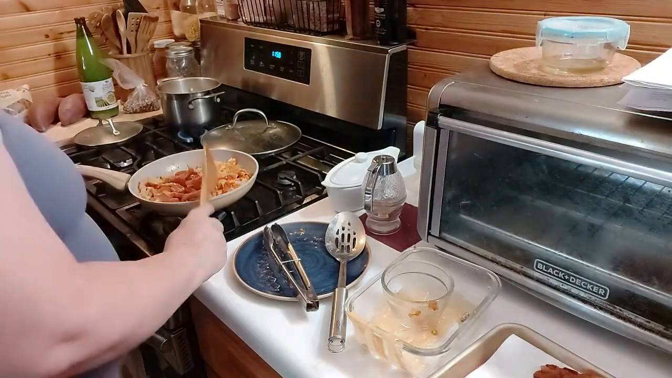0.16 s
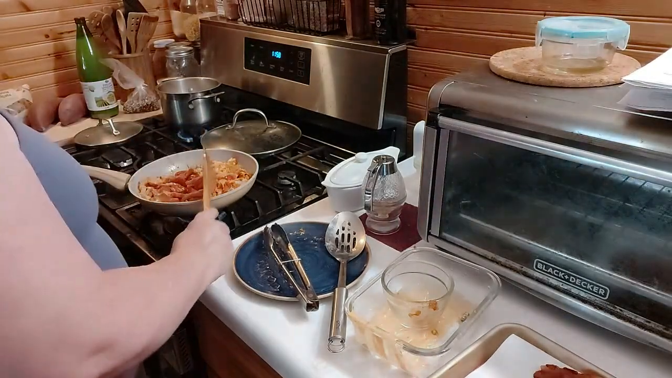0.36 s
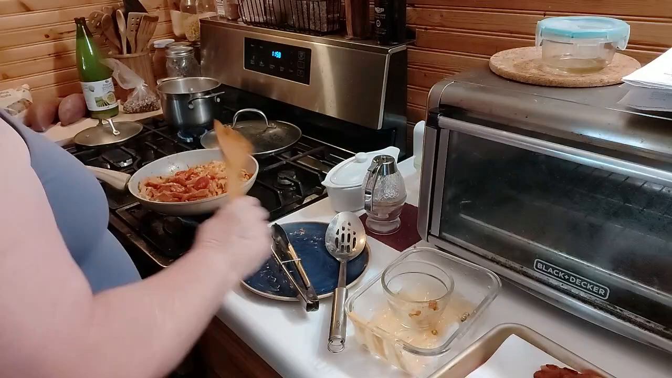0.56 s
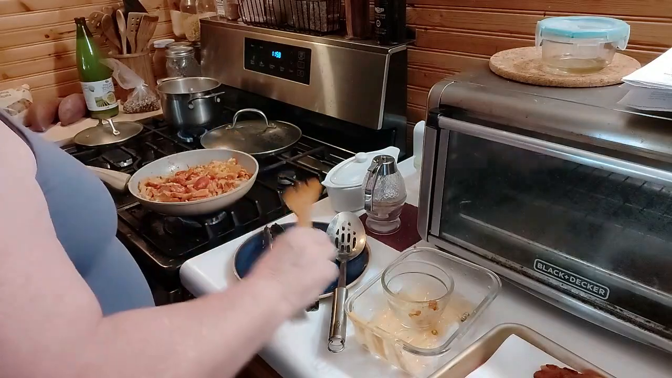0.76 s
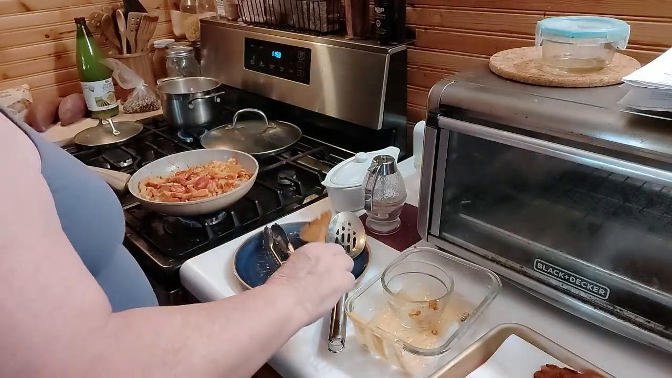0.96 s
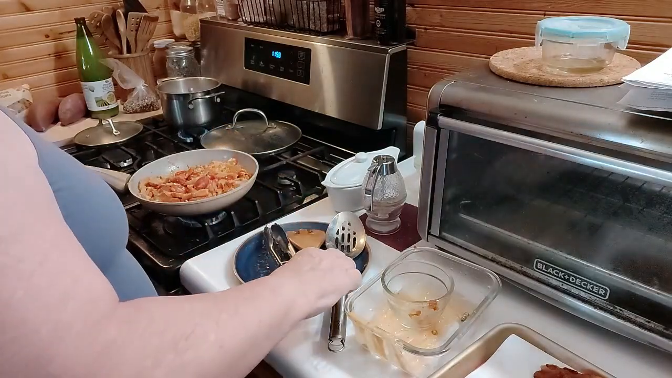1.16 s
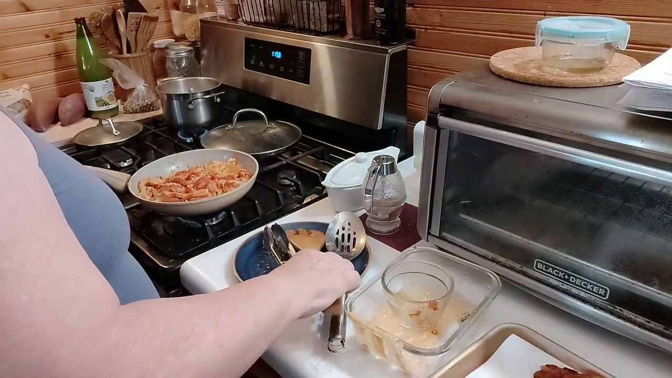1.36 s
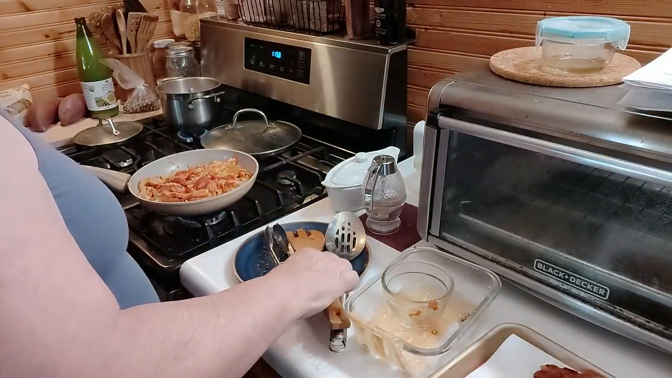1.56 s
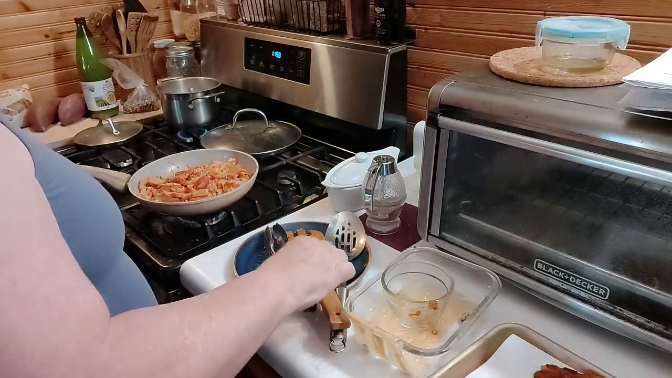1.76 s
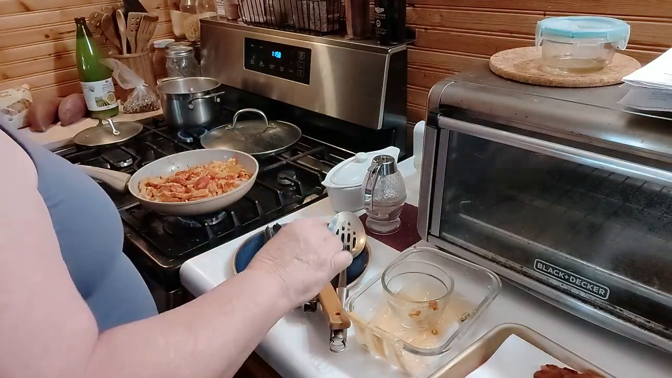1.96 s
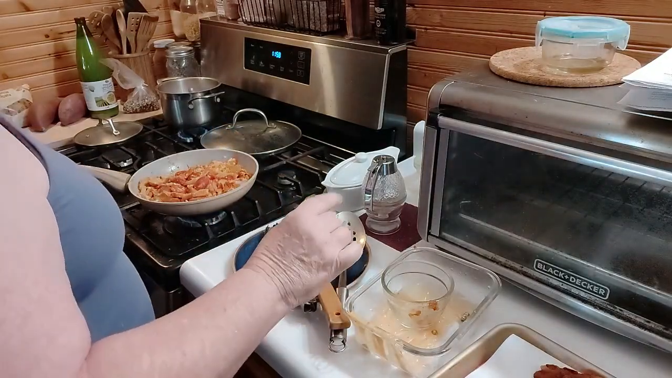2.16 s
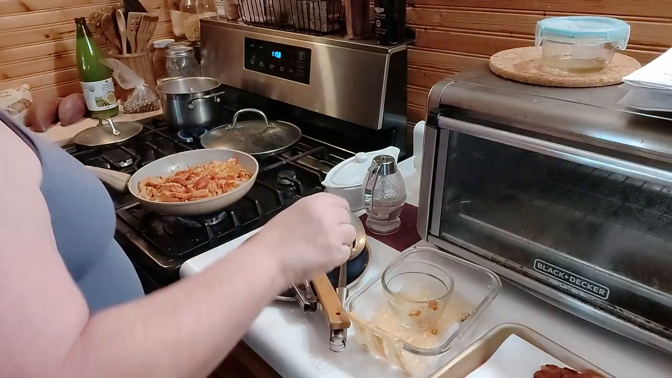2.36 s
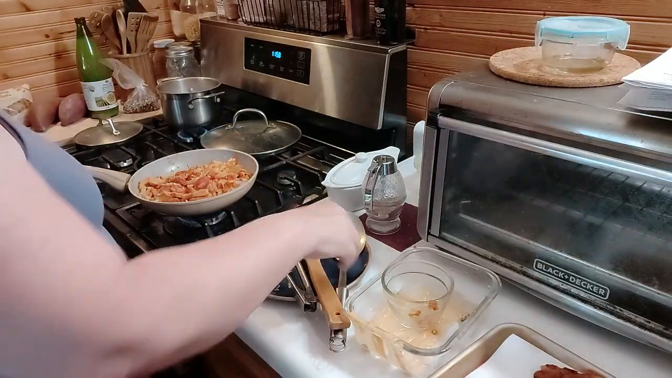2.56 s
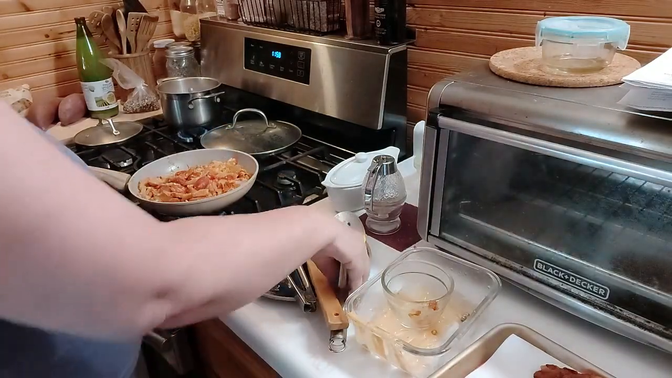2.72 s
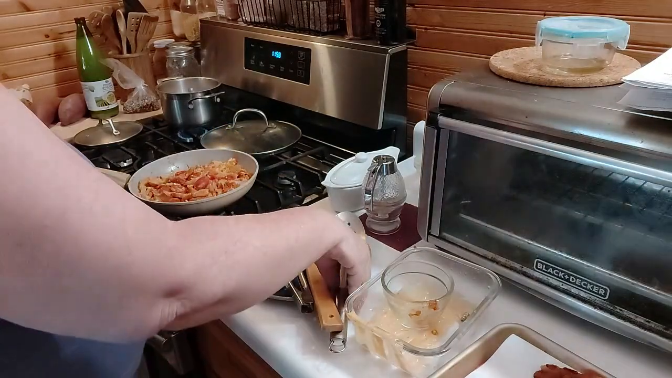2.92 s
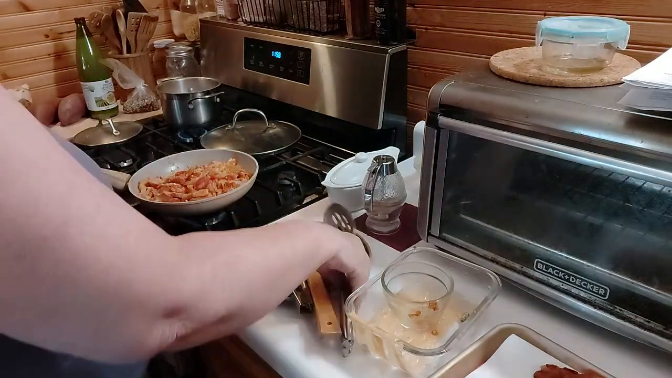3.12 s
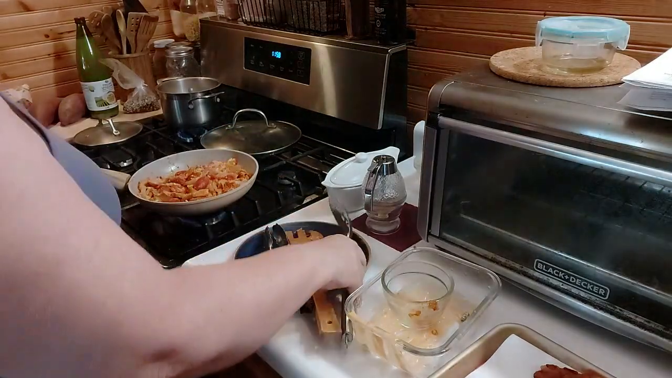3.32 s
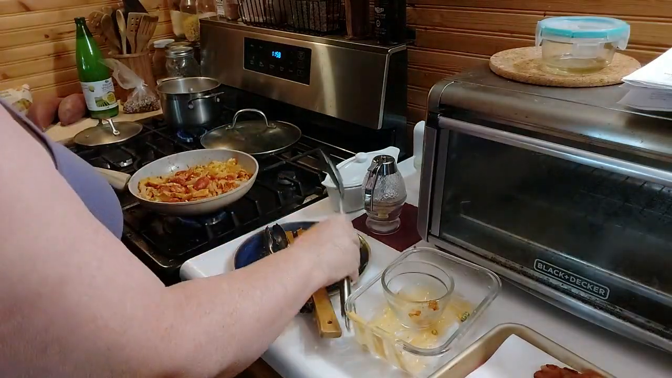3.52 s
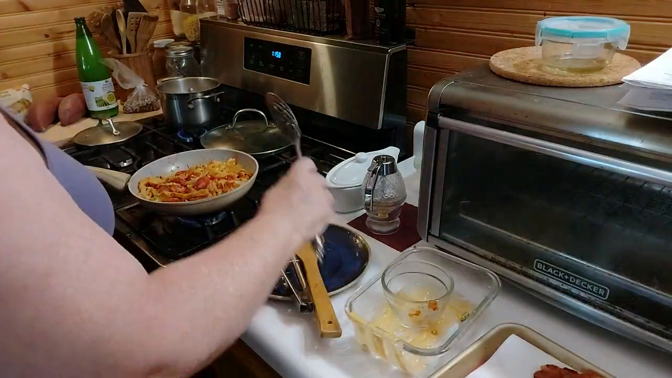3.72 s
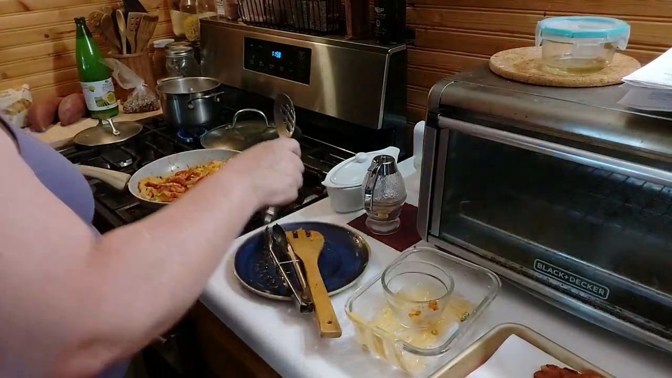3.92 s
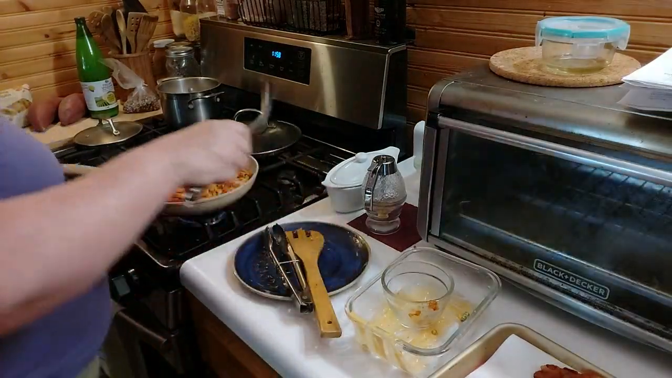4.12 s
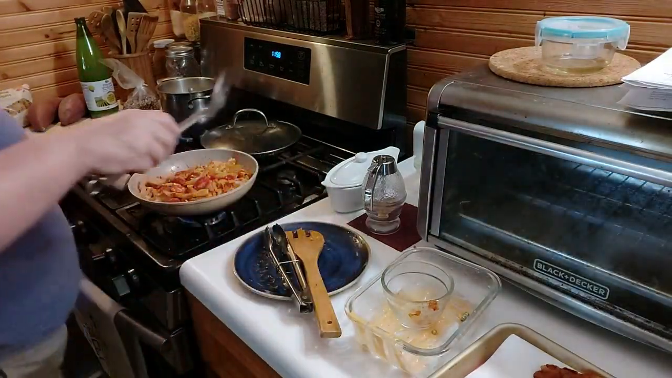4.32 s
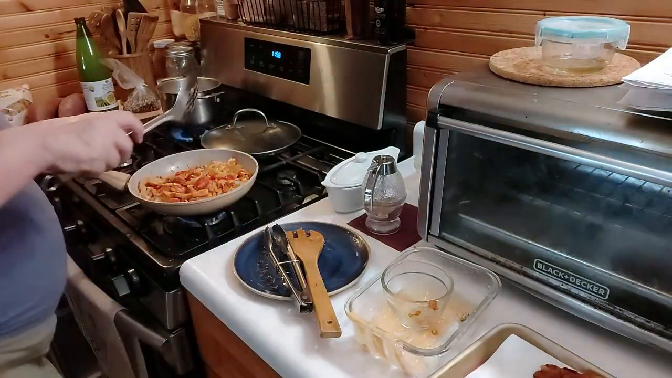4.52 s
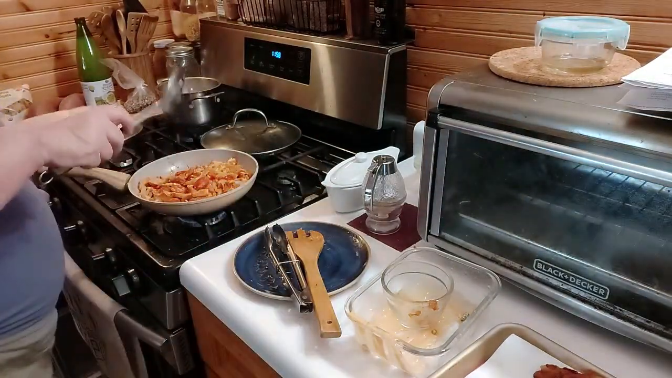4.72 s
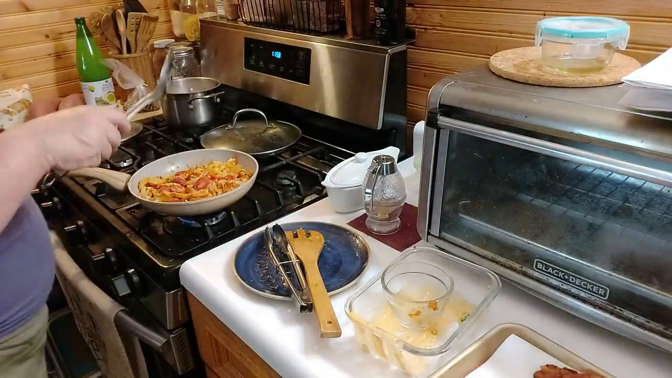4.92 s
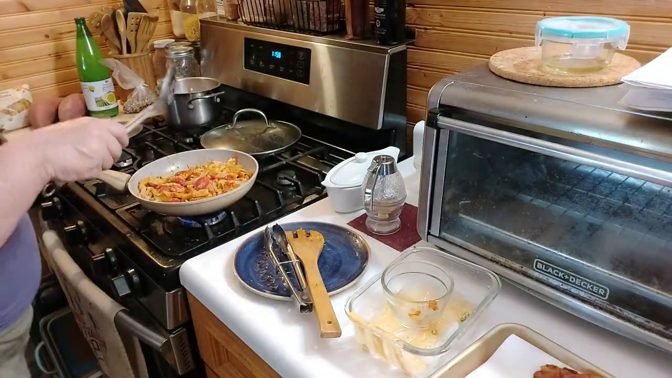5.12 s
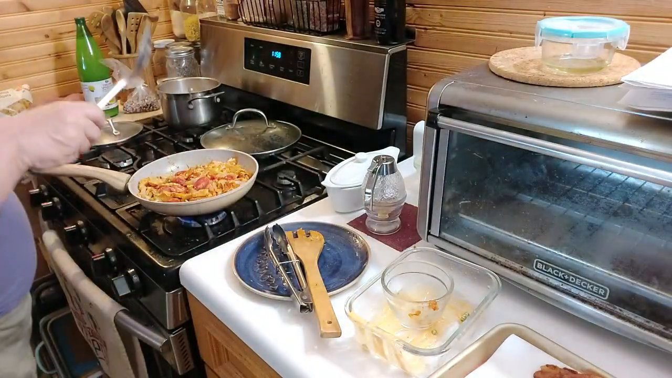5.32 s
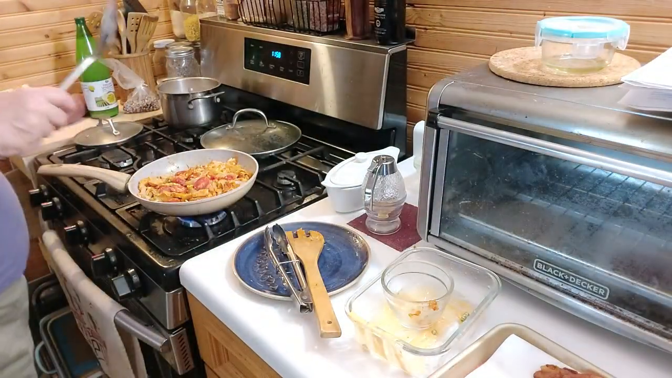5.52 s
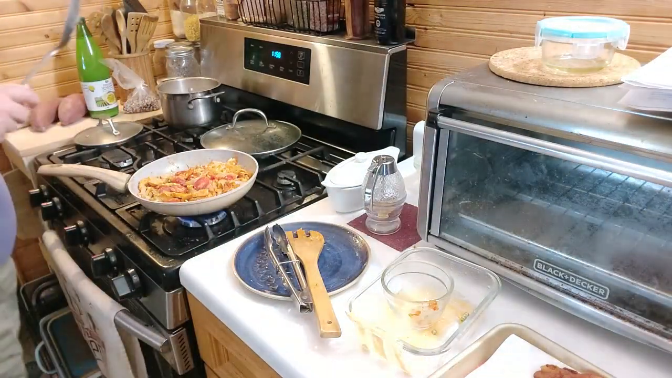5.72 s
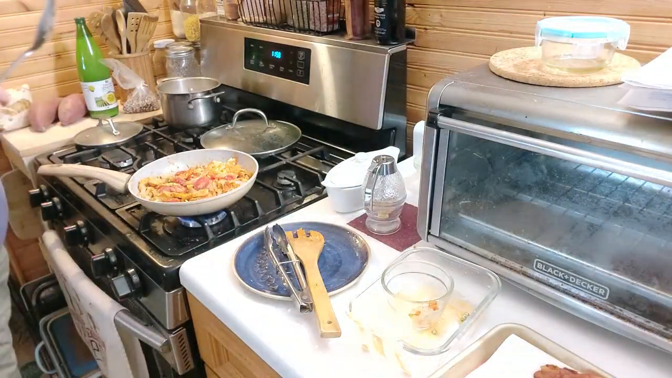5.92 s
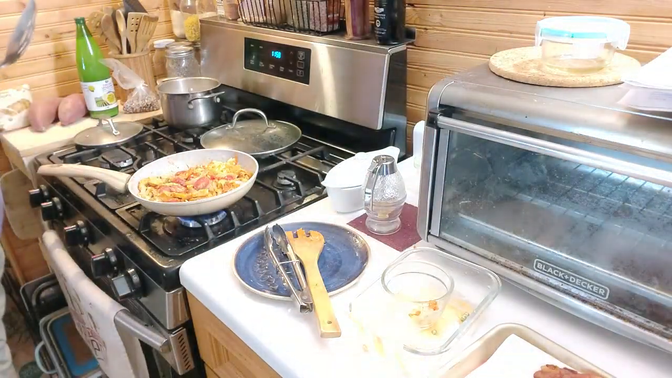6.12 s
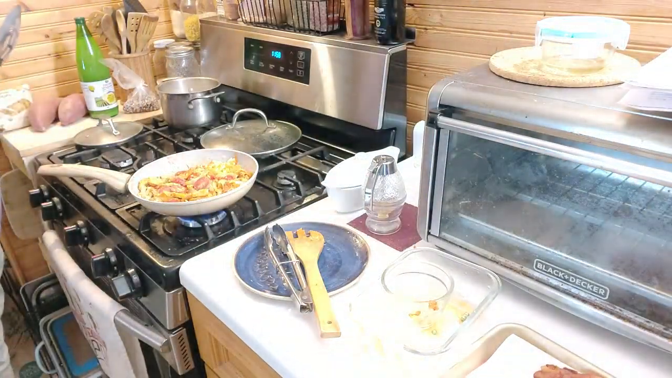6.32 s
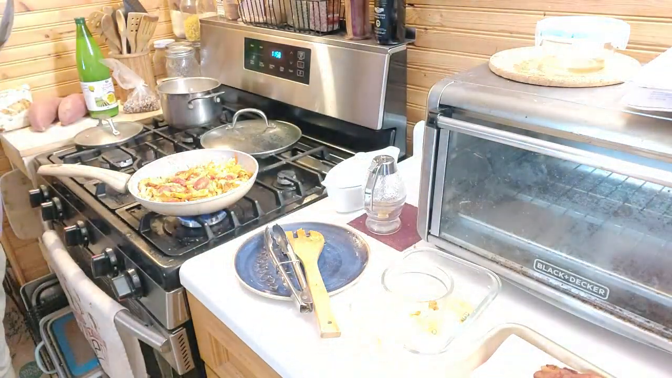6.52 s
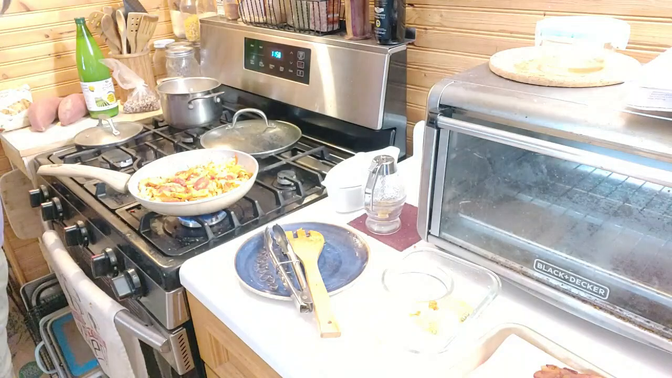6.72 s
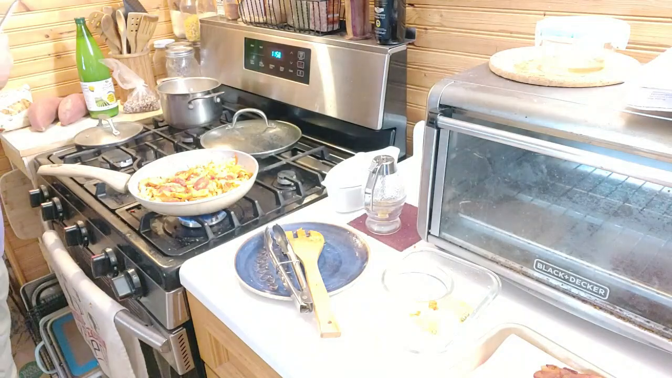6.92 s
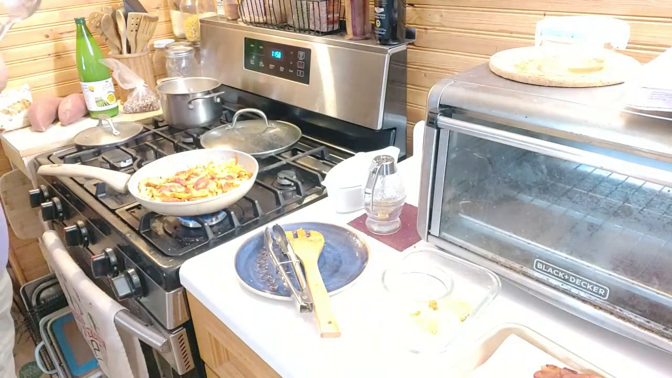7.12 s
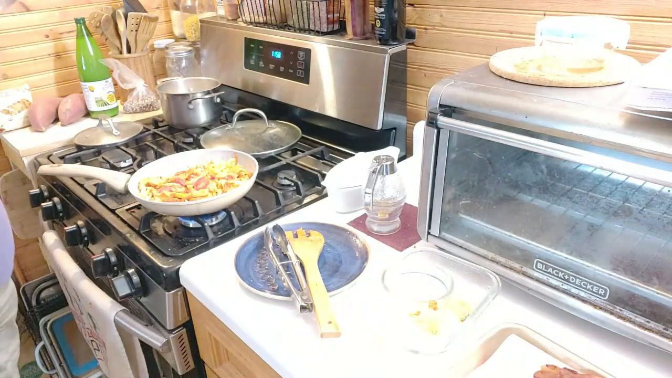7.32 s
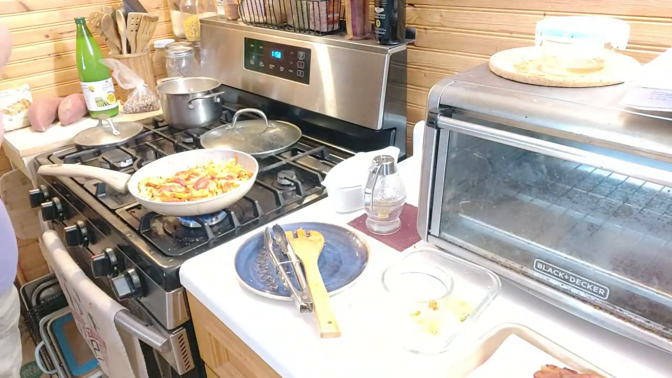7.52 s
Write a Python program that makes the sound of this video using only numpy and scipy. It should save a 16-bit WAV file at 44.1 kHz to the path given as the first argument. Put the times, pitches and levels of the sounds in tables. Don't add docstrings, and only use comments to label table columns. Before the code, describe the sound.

In a small kitchen, a spatula raps a pan twice, steel utensils clatter briefly on a plate, then quiet frying spits softly.

```python
import sys
import numpy as np
from scipy import signal
from scipy.io import wavfile

SR = 44100
rng = np.random.default_rng(int(sys.argv[2]) if len(sys.argv) > 2 else 0)


def pcm_store(signal):
    levels = np.round(np.clip(np.atleast_2d(signal), -1, 1) * 32767)
    wavfile.write(sys.argv[1], SR, levels.astype(np.int16).T)


N = 333837

# band_hz, level_db (per Hz)
AIR_COLOUR = [(30, -43), (45, -14), (70, -6.5), (110, -16), (160, -16.5), (330, -18), (550, -16.5),
              (1100, -20.5), (2500, -27.5), (5000, -34), (7000, -35.5), (11500, -33), (14000, -28),
              (17000, -45)]
# band_hz, correlation
AIR_LIKENESS = [(60, 0.78), (180, 0.91), (400, 0.66), (800, 0.036), (1650, -0.26), (4970, -0.0075),
                (15000, -0.13)]
# time_s, level_db
AIR_LEVEL = [(0, -58.5), (.9, -60), (2.2, -60.5), (3.0, -59.5), (4.1, -59.5), (5.8, -58), (7.57, -58)]
# pitch_hz, width_hz, level_db (rms)
MOTOR_LINES = [(57.3, 9.6, -50), (119.7, 1.8, -64), (187, 11, -71.5), (241, 6.3, -69), (267, 8.7, -80.5),
               (293, 3, -64.5), (336.3, 12.6, -66), (534.6, 1.8, -65), (4100, 140, -73)]
# start_s, level_db (rms), pitch_hz, width_octaves, length_s
STEAM_HISSES = [(2.416, -62, 7000, 1.5, .062), (2.57, -59.5, 11500, .6, .09), (2.762, -61, 11900, .4, .07),
                (2.946, -59, 11000, 0.44, .1), (4.02, -59.5, 10000, .6, .094),
                (4.477, -52.5, 7900, 5.2, 0.073), (5.17, -57, 9300, 0.73, .11),
                (5.26, -62.5, 9000, 0.42, .098), (5.688, -62.5, 8550, 0.18, 0.23),
                (6.24, -55.5, 12000, .8, .14), (6.258, -59.5, 4400, 1.3, 0.14),
                (6.70, -60, 15000, .2, 0.095), (6.793, -61, 13000, .6, 0.077),
                (6.94, -61.5, 8400, 0.92, .11)]
# start_s, peak_db, pitch_hz
FAT_SPITS = [(2.2323, -48.5, 11950), (2.4426, -55, 9630), (2.5773, -51.5, 14500), (2.7808, -45, 12300),
             (3.7192, -44, 15100), (3.794, -46, 11300), (4.002, -50.5, 11600), (4.2972, -48, 10930),
             (4.4224, -43, 9900), (4.5094, -58, 11100), (4.61, -47.5, 9600), (4.6975, -41, 11600),
             (5.3126, -48, 11400), (5.7632, -44, 8450), (5.7962, -44, 8830), (5.9273, -47.5, 9150),
             (6.13, -49, 9000), (6.729, -49, 14940), (6.8007, -41.5, 15200), (7.0435, -48, 7500),
             (7.168, -50, 3600), (7.333, -52, 9000), (6.66, -51, 6500), (7.4604, -40.5, 5500),
             (7.507, -43, 10700)]

# band_hz, t60_s
KITCHEN_T60 = [(70, 0.59), (150, 0.38), (300, 0.42), (700, .38), (1800, 0.31), (5000, 0.28), (13000, .25)]
# band_hz, correlation
ECHO_LIKENESS = [(60, 0.93), (180, 0.99), (400, 0.85), (800, 0.54), (1650, 0.14), (4970, 0.036),
                 (15000, 0.058)]
EDGES_HZ = 40 * 2 ** np.arange(0, 9.0, .4)

# pitch_hz, level_db, t60_s
SKILLET_MODES = [(145, -3.5, 0.12), (297, -2.5, 0.11), (374.7, 5.5, 0.095), (500, -7, 0.053),
                 (630, -24, 0.085), (800, 2.5, 0.041), (1225, -4.5, 0.14), (1700, -9, 0.049),
                 (2970, -34, .03), (3500, -4, 0.075)]
PLATE_MODES = [(311.6, 3.5, 0.11), (418, -28, 0.027), (450, -1, 0.02), (1420, -4, 0.07), (1850, 5.5, 0.086),
               (2660, 6, 0.035), (3300, 6, 0.037), (4200, -76, 0.046), (4480, -5, 0.056), (5500, -35, .05)]
POT_MODES = [(547, 2.5, 0.03), (1160, -6, 0.1), (1500, 5, 0.044), (2240, -14, .05), (4140, -10, 0.091),
             (4270, -8, .14), (5700, -23, .03)]
# band_hz, level_db (per Hz)
SKILLET_CRACK = [(45, -6), (70, -14), (150, -1), (230, -13), (380, -2), (800, 2), (1500, 2), (3000, -5.5),
                 (8000, -13.5), (12000, -19.5), (16000, -33)]
PLATE_CRACK = [(45, -4), (70, 2), (130, 8.5), (210, -55), (330, 6), (700, -3.5), (1400, -1), (3200, 4),
               (7000, -9.5), (12000, -11), (16000, -74)]
SPOON_CRACK = [(130, 5), (210, -27), (330, 4), (700, -1.5), (1900, 1.5), (4000, -1), (11000, -14),
               (16000, -34)]
POT_CRACK = [(70, -7), (130, -11.5), (240, -15), (420, -8.5), (1300, -1), (2500, -5), (3300, -33),
             (4400, -3), (6500, -19.5), (11500, -16.5), (16000, -41.5)]

# start_s, peak_db
RIM_BLOWS = [
    (0.1716, -14),
    (0.3791, -16.5),
]
# delay_s, level_db, extra_treble_db, knock_pitch_hz, knock_db
RIM_CONTACTS = [
    (-.0037, -3, -1.5, 1300, -10),
    (0, -1, -2.5, 1445, -31),
    (.014, -5.5, 1.5, 600, 0.5),
]
RIM_BASS = (2.5, 0.5, 5)
# start_s, peak_db, knock_pitch_hz, knock_db
LAID_DOWN = [(1.094, -37.5, 1750, 14.5), (1.099, -46, 5500, 21), (1.104, -34, 4240, -6),
             (1.218, -45.5, 2980, -7), (1.252, -39, 4300, -9), (1.5175, -22, 2700, -20),
             (1.525, -20, 1950, 5), (1.541, -22, 1420, 9), (1.5955, -22.5, 3290, -0.5),
             (1.600, -30, 1420, 19), (1.619, -31, 4200, 8), (1.643, -39, 1420, 3)]
# start_s, peak_db, knock_pitch_hz, knock_db
PICKED_UP = [(2.925, -39, 2110, 1.4), (3.211, -27.5, 1500, 4.5), (3.222, -19, 3450, 1.1),
             (3.227, -27.5, 1850, 4.5), (3.239, -24.5, 4100, 2.7), (3.255, -25.5, 1280, 2.7),
             (3.311, -31.5, 3810, 9), (3.348, -38, 1940, 2.6), (3.37, -41, 1080, 19.3),
             (3.497, -38, 2180, 9.3), (3.501, -50, 4100, 4.4), (3.53, -50, 2210, 6)]
# start_s, peak_db, knock_pitch_hz, knock_db
THUDS = [(1.098, -37, 445, 19.5), (1.27, -51.5, 320, 27.5), (1.474, -60.5, 450, 35), (1.520, -36, 450, 24),
         (1.601, -35, 450, 19), (2.198, -60, 1080, 24), (2.935, -46, 468, 17.5), (3.222, -31, 449, 21),
         (3.267, -32, 325, 15.5), (3.33, -43, 313, 23.5), (3.371, -41.5, 820, 23.5), (3.505, -43, 880, 13)]
# start_s, length_s, level_db (rms)
RIM_SLIDES = [(.95, .15, -70), (2.27, .25, -68), (3.40, .11, -66), (4.62, .13, -73), (5.75, .1, -73)]
# start_s, peak_db, knock_pitch_hz
POT_TAPS = [
    (4.7581, -33.5, 4300),
    (4.763, -37.5, 1180),
]


def from_db(db):
    return 10 ** (np.asarray(db) / 20)


def unit_rms(x):
    return x / np.sqrt(np.mean(x ** 2) + 1e-20)


def at_hz(points, hz):
    table_hz, value = np.array(points).T
    return np.interp(np.log(hz), np.log(table_hz), value)


def drift(rate_hz):
    step = 40
    pole = np.exp(-2 * np.pi * rate_hz * step / SR)
    slow = signal.lfilter([1], [1, -2 * pole, pole * pole], rng.standard_normal(N // step + 2002))
    slow = unit_rms(slow[2000:])
    return np.interp(np.arange(N) / step, np.arange(len(slow)), slow)


def ring(x, hz, t60_s):
    pole = from_db(-60 / (t60_s * SR))
    turn = 2 * np.pi * hz / SR
    return signal.lfilter([0, np.sin(turn)], [1, -2 * pole * np.cos(turn), pole * pole], x)


def cut(x, kind, hz, order=2):
    return signal.sosfilt(signal.butter(order, hz, kind, fs=SR, output="sos"), x)


def stereo_bands(size, likeness):
    white = rng.standard_normal((2, 2, size))
    for k, (low, high) in enumerate(zip(EDGES_HZ, EDGES_HZ[1:])):
        mid, side = cut(white[k % 2], "band", [low, high])
        hz = np.sqrt(low * high)
        alike = np.clip(at_hz(likeness, hz), -1, 1)
        yield hz, low, high, np.sqrt(1 + alike) * mid + np.sqrt(1 - alike) * side * [[1], [-1]]


def room_air(level_db, patchy_db):
    together = drift(4.5)
    air = 0
    for hz, _, _, noise in stereo_bands(N, AIR_LIKENESS):
        flicker_db = patchy_db * (together / 2 + drift(18.0))
        air = air + from_db(at_hz(AIR_COLOUR, hz) + flicker_db) * noise
    return from_db(level_db) * unit_rms(air)


def refrigerator():
    t, out = np.arange(N) / SR, 0
    for hz, width_hz, db in MOTOR_LINES:
        height = from_db(db + 0.5 + 2.05 * drift(width_hz))
        phase = 2 * np.pi * hz * t + 1.25 * drift(width_hz / 3)
        out = out + height * np.sin(phase + [[0], [np.pi * hz / 1500]])
    return out


def sizzle(level_db, per_s, spread_db):
    sizes = from_db(spread_db * np.minimum(rng.exponential(1, (2, N)), 5)) * rng.choice([-1, 1], (2, N))
    born = rng.random((2, N)) < per_s / SR
    pitch_of_burst, out = rng.integers(0, 8, (2, N)), 0
    for k, hz in enumerate(np.geomspace(3500, 15500, 8)):
        bursts = sizes * born * (pitch_of_burst == k) + 1e-18
        out = out + from_db(drift(4.3)) * ring(bursts, hz, 6.8 / hz)
    return from_db(level_db) * unit_rms(out)


def steam_hisses(grainy_db):
    out = np.zeros((2, N))
    for s, db, hz, octaves, length_s in STEAM_HISSES:
        grains = rng.standard_normal((2, SR // 4)) * from_db(grainy_db * rng.standard_normal(SR // 4))
        half_band = 2 ** (octaves / 2)
        hiss = unit_rms(cut(grains, "band", [hz / half_band, min(hz * half_band, .45 * SR)]))
        swell = np.hanning(min(round(length_s * SR), SR // 4))
        out[:, round(s * SR):][:, :len(swell)] += from_db(db) * hiss[:, :len(swell)] * swell
    return out


def fat_spits(length_s, level_db):
    t, out = np.arange(SR // 8) / SR, np.zeros((2, N + SR))
    for s, peak_db, hz in FAT_SPITS:
        grains = rng.standard_normal((2, len(t))) * from_db(8.5 * rng.standard_normal(len(t)))
        hiss = unit_rms(cut(grains, "band", [hz / 1.22, min(hz * 1.18, .45 * SR)]))
        out[:, round(s * SR):][:, :len(t)] += from_db(peak_db + level_db) * hiss * np.exp(-t / length_s)
    return out[:, :N]


def kitchen(colour, direct_db, early_db, early_t60, build_s):
    t = np.arange(SR // 2) / SR
    left_lag = 5
    click = np.array([np.eye(1, len(t), left_lag)[0], np.eye(1, len(t))[0]])
    click = cut(click, "low", 7300, order=1)
    direct, noises, shapes = 0, [], []
    for k, (hz, low, high, noise) in enumerate(stereo_bands(SR, ECHO_LIKENESS)):
        gain = from_db(at_hz(colour, hz))
        rise = 1 - np.exp(-t / (build_s + 3.1 / hz))
        tail = from_db(-60 * t * (1 + t / 3.8) / at_hz(KITCHEN_T60, hz))
        near = from_db(early_db - 60 * t / early_t60)
        sign = (-1) ** k
        direct = direct + gain * from_db(direct_db) * cut(click, "band", [low, high]) * sign
        noises.append(noise)
        shapes.append(gain * rise * (tail + near))
    noises, shapes = np.array(noises), np.array(shapes)

    def answer(start):
        return direct + np.einsum("bct,bt->ct", noises[:, :, start:start + len(t)], shapes)
    return answer


def blows(contacts, modes, colour, ring_db, knock_s, level_db, room):
    click, out = np.eye(1, SR // 4)[0], np.zeros((2, N + SR))
    for s, peak_db, bass_db, treble_db, knock_hz, knock_db in contacts:
        body = click
        for (hz, db, t60), uneven_db in zip(modes, 2 * rng.standard_normal(len(modes))):
            mode_db = db + ring_db + uneven_db - at_hz(colour, hz)
            body = body + from_db(mode_db) * ring(click, hz, t60)
        bass, treble = cut(body, "low", 730), cut(body, "high", 2670)
        body = body + (from_db(bass_db) - 1) * bass + (from_db(treble_db) - 1) * treble
        t60 = knock_s * np.sqrt(1000 / knock_hz)
        knock = ring(click, knock_hz, t60) * 20 / (t60 * SR) * from_db(knock_db)
        echo = room(rng.integers(SR // 8, SR // 2))
        heard = signal.fftconvolve((body + knock)[None], echo, axes=1)
        out[:, round(s * SR):][:, :heard.shape[1]] += from_db(peak_db + level_db) * heard
    return out[:, :N]


def clinks(table):
    return [(s, db, -3, 0.5 * (db + 31), hz, knock_db) for s, db, hz, knock_db in table]


def sliding_handle():
    t, stroke = np.arange(N) / SR, 0
    for s, length_s, db in RIM_SLIDES:
        stroke = stroke + from_db(db) * np.sin(np.pi * np.clip((t - s) / length_s, 0, 1))
    return stroke * unit_rms(ring(rng.standard_normal((2, N)), hz=4430, t60_s=0.021))


def tapped_pot():
    from_back = kitchen(POT_CRACK, direct_db=6.0, early_db=-8.0, early_t60=0.029, build_s=0.0009)
    contacts = [(s, db, 4.5, -0.1, hz, 6.7) for s, db, hz in POT_TAPS]
    return blows(contacts, POT_MODES, POT_CRACK, ring_db=-46.0, knock_s=0.02, level_db=12.3, room=from_back)


def lifted_spoon():
    from_spoon = kitchen(SPOON_CRACK, direct_db=30, early_db=9.5, early_t60=0.053, build_s=0.00046)
    return blows(clinks(PICKED_UP), PLATE_MODES, SPOON_CRACK, ring_db=-45.0, knock_s=0.027,
                 level_db=-9.5, room=from_spoon)


def laid_on_plate():
    from_counter = kitchen(PLATE_CRACK, direct_db=32.5, early_db=7, early_t60=.04, build_s=.0004)
    clinking = blows(clinks(LAID_DOWN), PLATE_MODES, PLATE_CRACK, ring_db=-47.0, knock_s=0.055,
                     level_db=-9.0, room=from_counter)
    thuds = [(s, db, 7, 4, hz, knock_db) for s, db, hz, knock_db in THUDS]
    rocking = blows(thuds, PLATE_MODES, PLATE_CRACK, ring_db=-56, knock_s=0.029,
                    level_db=-9.0, room=from_counter)
    return clinking + rocking


def knocked_skillet():
    from_stove = kitchen(SKILLET_CRACK, direct_db=22, early_db=9.5, early_t60=0.023, build_s=0.0036)
    contacts = []
    for s, db in RIM_BLOWS:
        for (delay_s, part_db, treble_db, hz, knock_db), bass_db in zip(RIM_CONTACTS, RIM_BASS):
            contacts.append((s + delay_s, db + part_db, bass_db, treble_db, hz, knock_db))
    return blows(contacts, SKILLET_MODES, SKILLET_CRACK, ring_db=-46.5, knock_s=0.017,
                 level_db=4.14, room=from_stove)


def scene():
    air_db = np.interp(np.arange(N) / SR, *np.transpose(AIR_LEVEL))
    background = room_air(air_db + 5, patchy_db=0.74) + refrigerator()
    frying = sizzle(-69.5, per_s=2100, spread_db=4.2) + steam_hisses(grainy_db=7.0)
    frying = frying + fat_spits(length_s=0.018, level_db=-11)
    plate = laid_on_plate() + lifted_spoon() + sliding_handle()
    return background + frying + tapped_pot() + plate + knocked_skillet()


def notch(x, hz, depth):
    width_hz = 66
    return x - np.clip(depth, 0, 1) * cut(x, "band", [hz - width_hz / 2, hz + width_hz / 2], order=1)


def low_pass(x):
    return signal.sosfilt(signal.butter(12, 16480, fs=SR, output="sos"), x)


def record(dry):
    top_cut = signal.cheby2(14, 60, 16200, fs=SR, output="sos")
    ports = signal.sosfilt(top_cut, dry * from_db([[.7], [-.7]]))
    ports = notch(ports, hz=1060, depth=0.75)
    ports = notch(ports, hz=2290, depth=0.43)
    mix = cut(ports, "high", 42, order=3)
    return low_pass(mix)


dry = scene()
out = record(dry)
pcm_store(out)
```